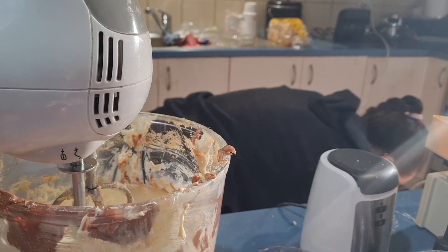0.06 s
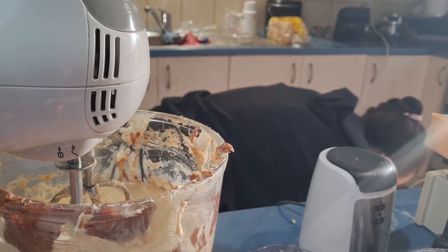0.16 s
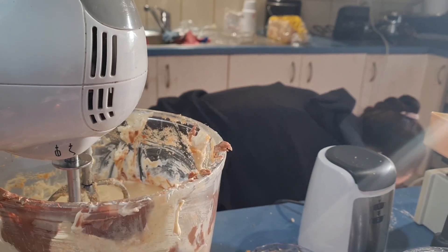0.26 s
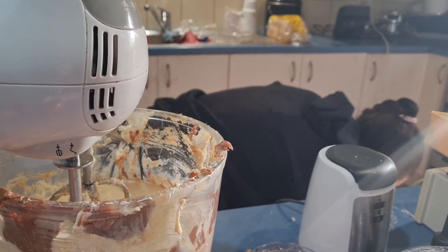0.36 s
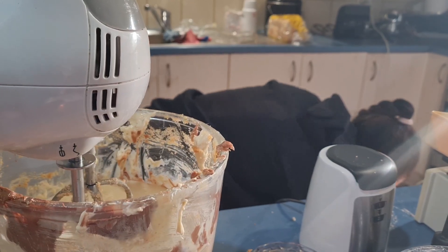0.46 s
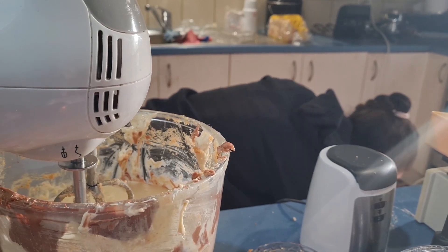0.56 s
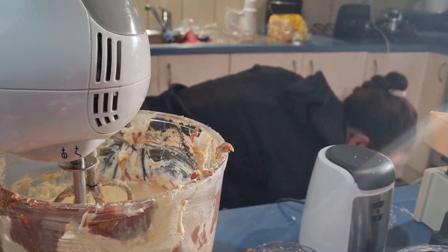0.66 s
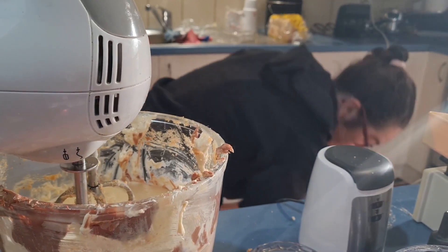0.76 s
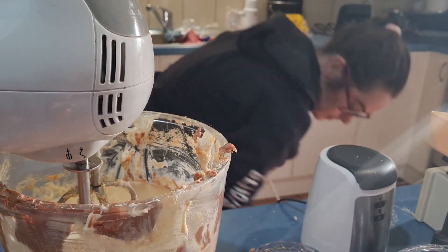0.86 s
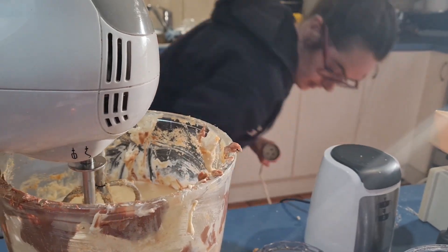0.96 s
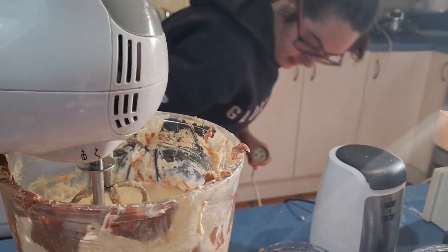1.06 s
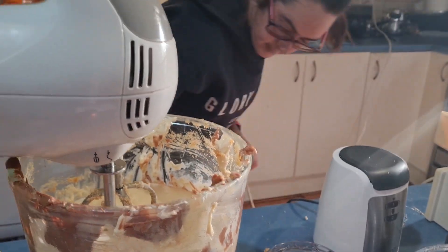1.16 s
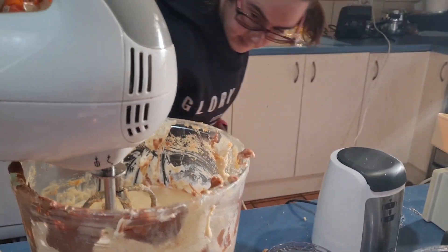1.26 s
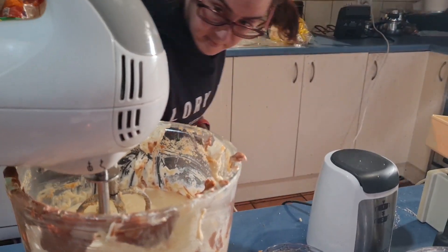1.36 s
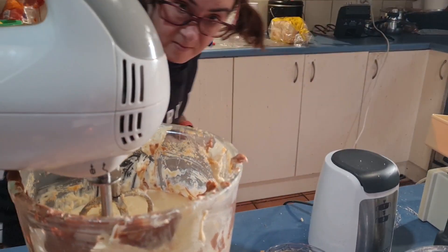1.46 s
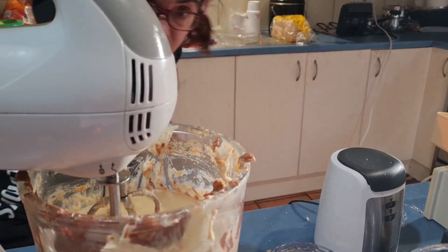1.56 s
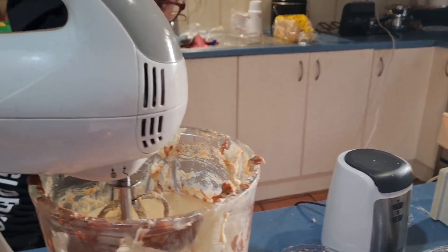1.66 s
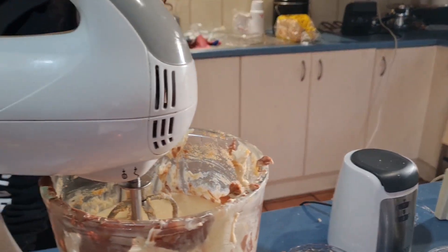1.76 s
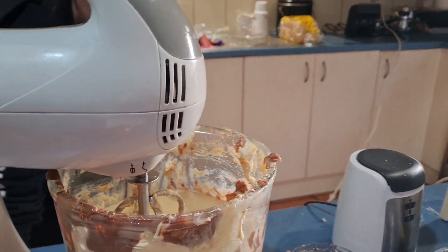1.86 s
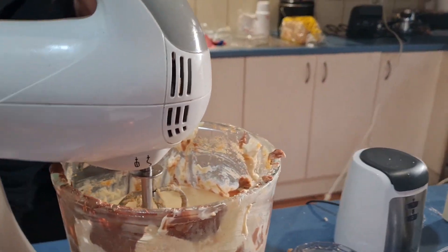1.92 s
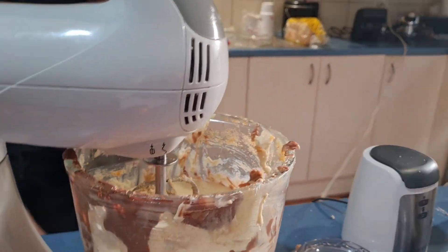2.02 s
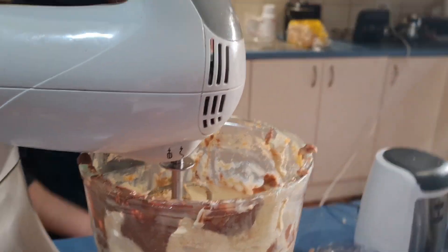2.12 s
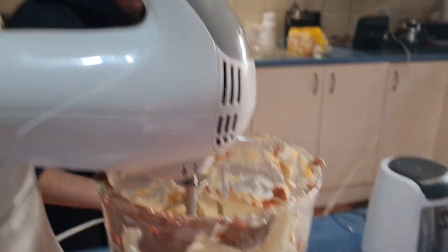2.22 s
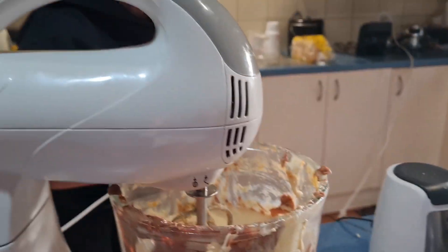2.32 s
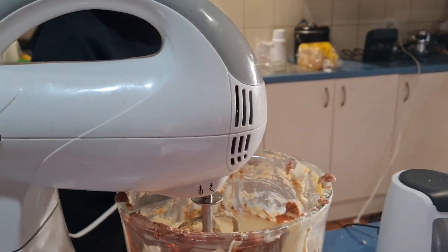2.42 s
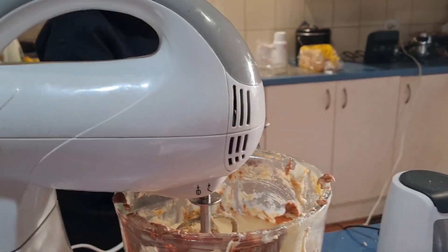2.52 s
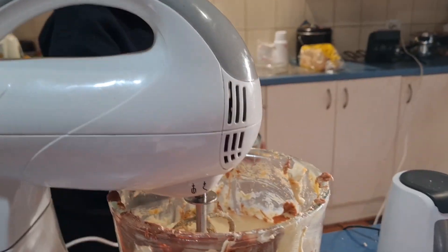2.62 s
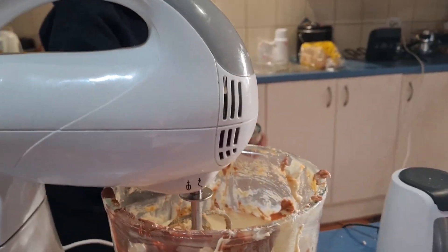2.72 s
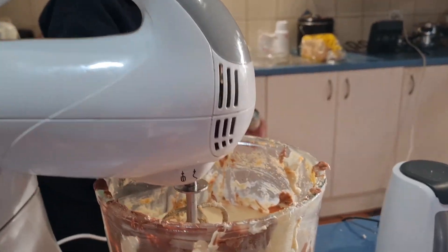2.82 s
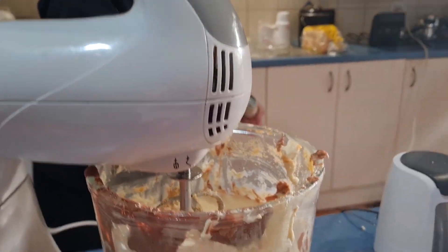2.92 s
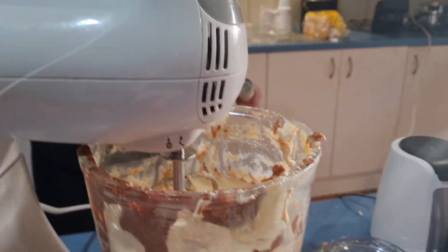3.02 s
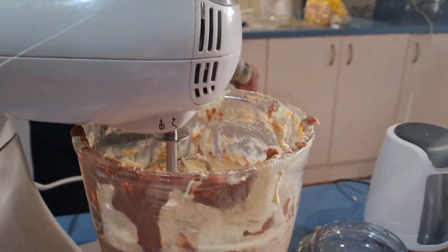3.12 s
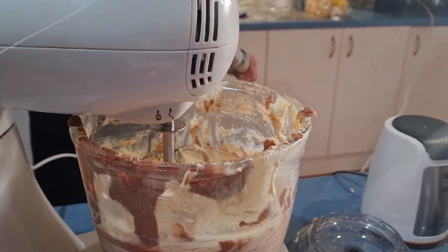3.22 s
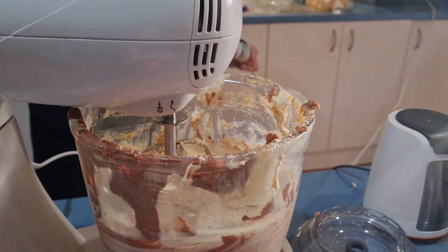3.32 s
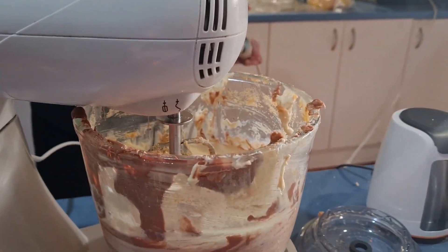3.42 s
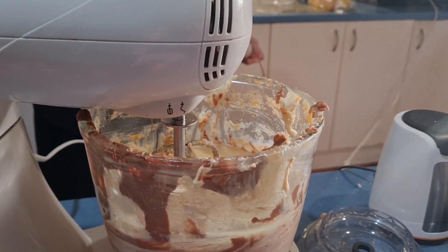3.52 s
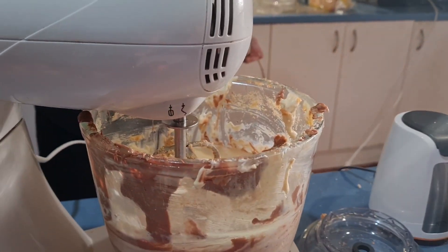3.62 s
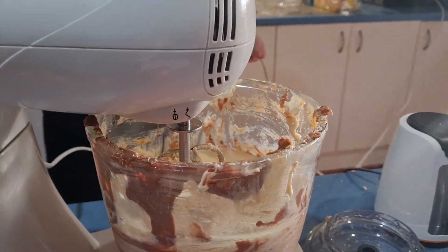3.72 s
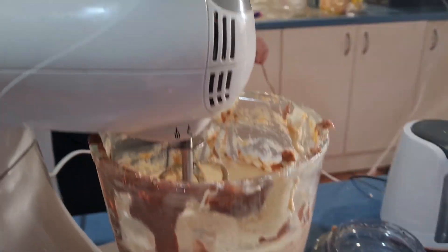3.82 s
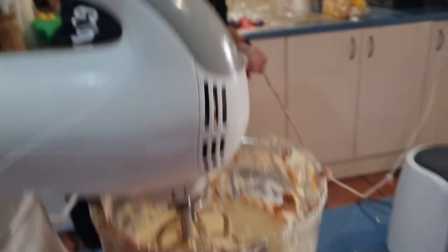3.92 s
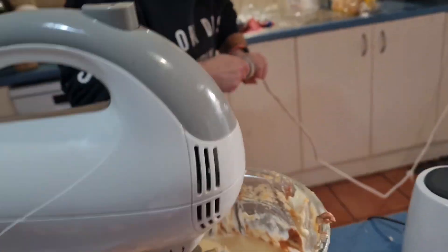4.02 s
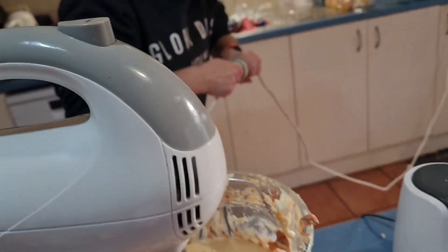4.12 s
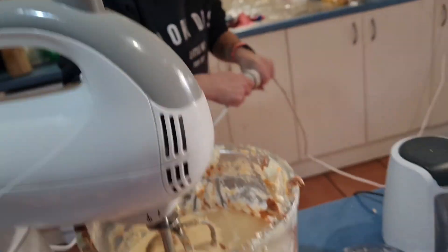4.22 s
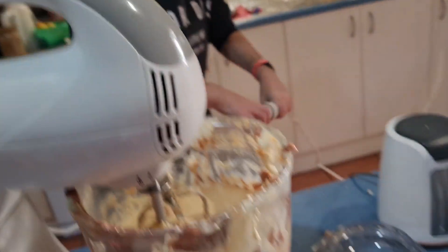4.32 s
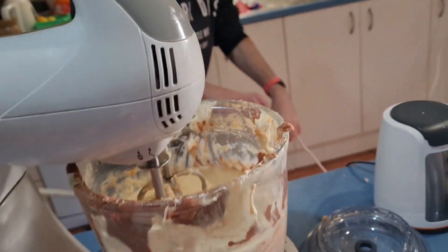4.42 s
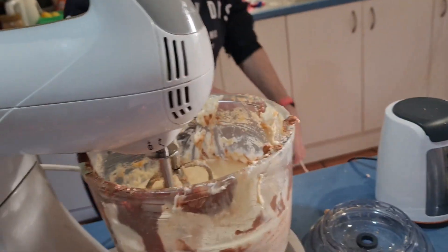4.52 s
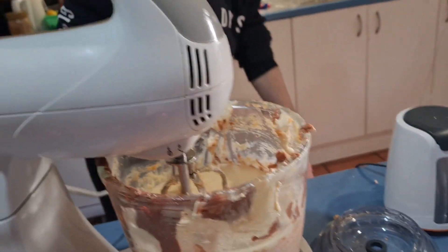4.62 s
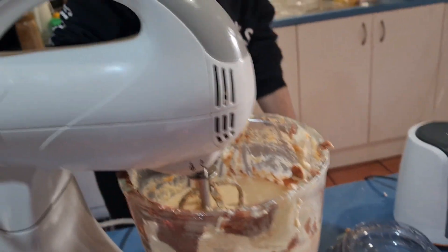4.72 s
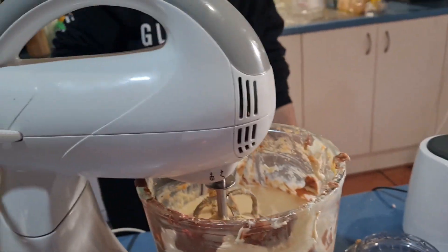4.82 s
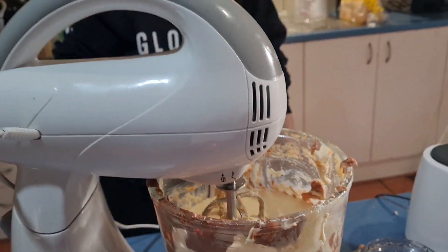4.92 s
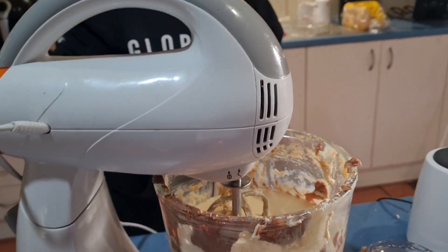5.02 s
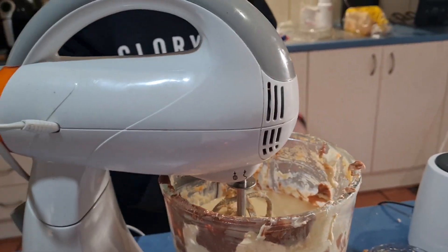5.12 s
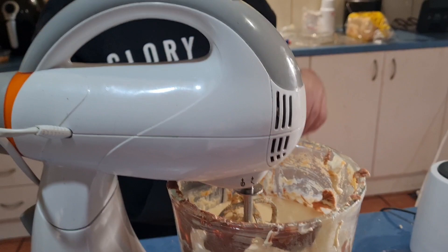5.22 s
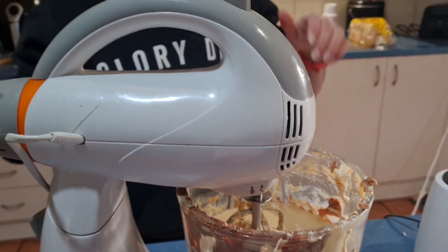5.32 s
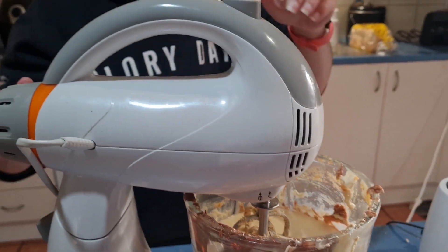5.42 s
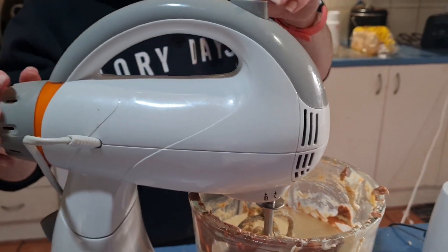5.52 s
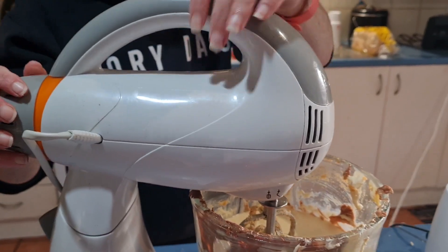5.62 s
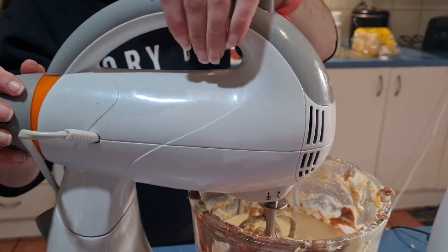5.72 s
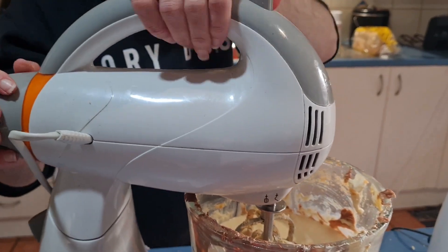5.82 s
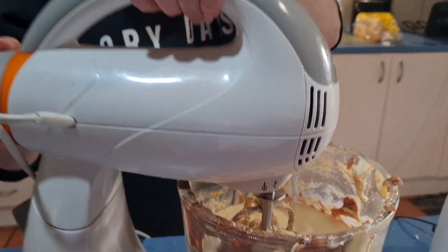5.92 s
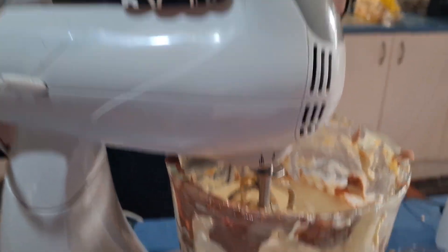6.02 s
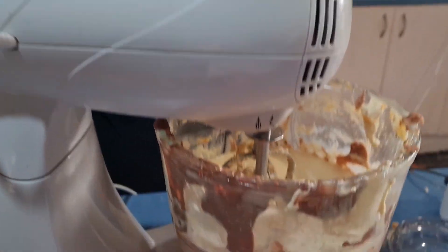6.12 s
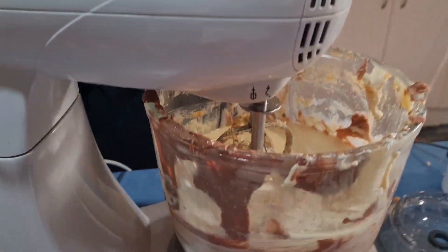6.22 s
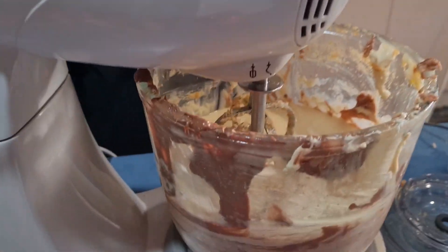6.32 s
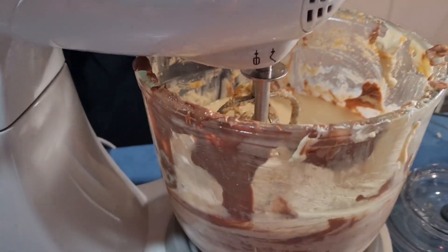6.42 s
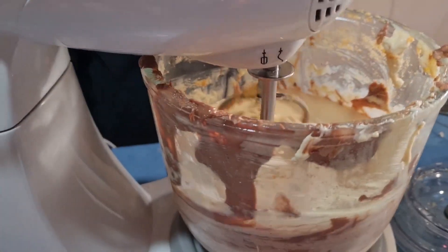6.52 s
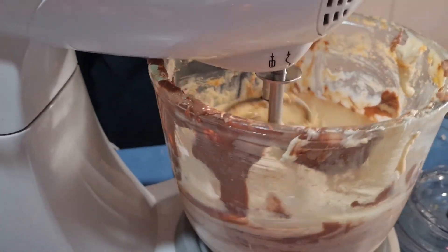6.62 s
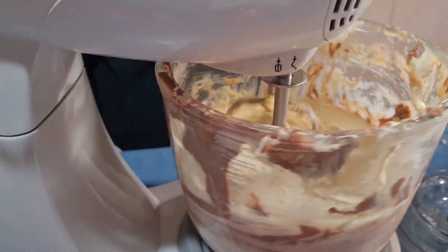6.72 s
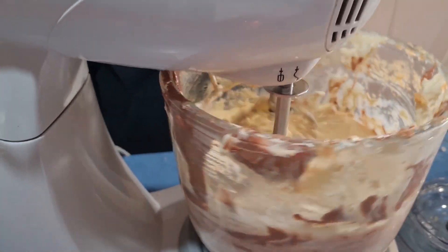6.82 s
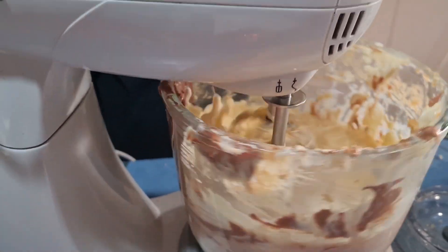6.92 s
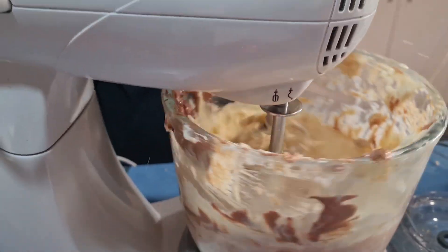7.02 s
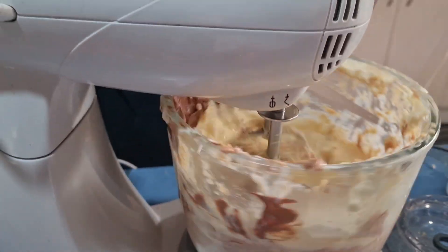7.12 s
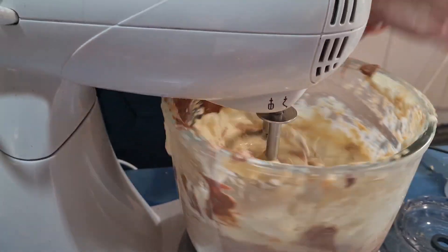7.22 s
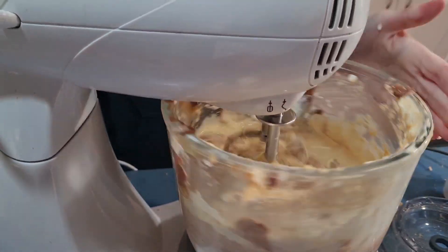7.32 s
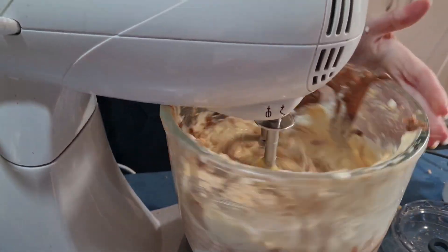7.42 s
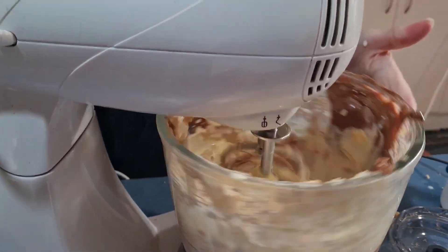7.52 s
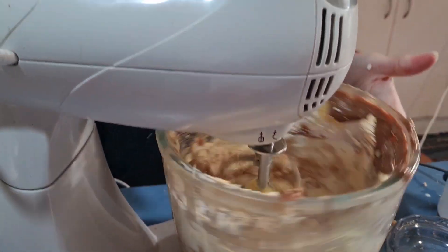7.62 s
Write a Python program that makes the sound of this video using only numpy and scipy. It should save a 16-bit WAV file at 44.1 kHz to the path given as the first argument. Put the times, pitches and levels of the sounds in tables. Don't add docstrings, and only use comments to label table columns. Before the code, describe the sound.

In a quiet tiled kitchen, slipper soles scuff and light taps and plastic plug knocks sound on a worktop, one hard thump early on. A brief scraping rub follows as the plug goes in. Then a switch snaps loudly and a nearby mixer motor spins up to a rough whining roar, beaters ticking and ringing a glass bowl. Close handheld phone, stereo.

```python
import sys
import numpy as np
from scipy import signal
from scipy.fft import rfft, irfft, next_fast_len
from scipy.io import wavfile
from scipy.ndimage import uniform_filter1d

SR = 44100
rng = np.random.default_rng(int(sys.argv[2]) if len(sys.argv) > 2 else 0)


def invert_db(level):
    return 10 ** (np.asarray(level, dtype=float) / 20)


def output_pcm(signal):
    pcm = np.clip(np.atleast_2d(signal).T, -1, 1) * 32767
    wavfile.write(sys.argv[1], SR, np.round(pcm).astype(np.int16))


N = 337792

TAIL_S = np.arange(12000) / SR
FIELD_HZ, BARS = 100, 24
FULL_HZ = 160
ROAR = (-28.5, 7.4)
# (frequency [Hz], width [Hz], level [dB])
WHINE_LEFT = [(2670, 140, -35), (2900, 200, -41), (3190, 280, -33.5), (3480, 160, -45), (3850, 60, -34),
              (3930, 100, -52), (4020, 40, -35)]


def evened(x):
    return x / np.sqrt(np.mean(x ** 2) + 1e-20)


def read(points, hz):
    f, value = np.transpose(points)
    return np.interp(np.log(hz + 1), np.log(f + 1), value)


def add(mix, start_s, sound):
    part = mix[round(start_s * SR):][:len(sound)]
    part += sound[:len(part)]


def band(x, lo_hz, hi_hz):
    return evened(signal.sosfilt(signal.butter(3, [lo_hz, hi_hz], "band", fs=SR, output="sos"), x))


def coloured(size, spectrum):
    gain = invert_db(read(spectrum, np.fft.rfftfreq(size, 1 / SR)))
    return irfft(rfft(rng.standard_normal(size)) * gain, size)


def resonate(x, hz, width_hz):
    turn = np.exp(2j * np.pi * np.cumsum(hz * np.ones(len(x))) / SR)
    r = np.exp(-np.pi * width_hz / SR)
    return 2 * (turn * signal.lfilter([1 - r], [1, -r], x / turn)).real


def waver(size, span_s):
    steps = round(span_s * SR)
    return evened(uniform_filter1d(uniform_filter1d(rng.standard_normal(size), steps), steps))


def burst(shape, lo_hz, hi_hz):
    rms = np.sqrt(np.mean(shape ** 2))
    return band(rng.standard_normal(len(shape)) * shape, lo_hz, hi_hz) * rms


def slide(peak_s, db, rise_s, hold_s, fall_s):
    t = np.arange(max(peak_s - rise_s, 0), peak_s + hold_s + fall_s, 1 / SR)
    away = np.maximum((peak_s - t) / rise_s, (t - peak_s - hold_s) / fall_s)
    return t, db - 30 * np.maximum(away, 0)


def rings(rows, rise_s):
    out = np.zeros(N)
    for s, hz, db, t60_s in rows:
        envelope = invert_db(db - 60 * TAIL_S / t60_s) * np.minimum(TAIL_S / rise_s, 1)
        add(out, s, envelope * np.sin(2 * np.pi * hz * TAIL_S))
    return out


def air():
    # (frequency [Hz], density [dB per Hz])
    air_spectrum = [(12, -26), (20, -16), (86, -11.5), (107, -12), (210, -9.5), (347, -13.5), (434, -10),
                    (485, -10), (574, -12), (759, -9.5), (825, -13.5), (949, -13.5), (3070, -21),
                    (4540, -31.5), (16000, -57.5)]
    # (time [s], half length [s], cloth lift [dB], hum lift [dB])
    swells = [(.05, 0.19, 5.5, 0.5), (1.36, 0.16, 6.5, 3), (1.944, 0.26, -0.5, 2.5), (2.446, 0.18, 7.5, 0),
              (2.93, 0.15, 6, -0.7), (3.91, 0.062, 12.5, 0.5), (4.62, 0.12, 8, -0.6), (4.95, 0.13, 12, 1),
              (5.3, 0.17, 4, 3), (5.913, 1, 2.5, 1.2)]
    t, noise = np.arange(N) / SR, coloured(N, air_spectrum)
    lifts_db = [np.outer(lift_db, np.exp(-((t - s) / half_s) ** 2)) for s, half_s, *lift_db in swells]
    cloth_db, hum_db = sum(lifts_db)
    cloth_db = cloth_db - 76.5 + 7.5 + 1.2 * waver(N, .02)
    hum_db = hum_db - 62 + 1.2 * waver(N, .04)

    low = signal.sosfilt(signal.butter(2, 900, fs=SR, output="sos"), noise)
    hum = evened(low)
    for hz, width_hz, db in [(587.5, 27, -9.5), (219.0, 25, -17.5), (73.0, 11, -17)]:
        hum += invert_db(db) * evened(resonate(noise, hz, width_hz))
    cloth = evened(noise - low)
    hiss = invert_db(-94) * band(rng.standard_normal(N), 9000, 17000)
    return hum * invert_db(hum_db) + cloth * invert_db(cloth_db) + hiss


def scuffs():
    # (peak time [s], hiss level [dB], rise [s], fall [s], body level [dB rel hiss])
    strokes = [(0.012, -62, 0.096, 0.045, -5.5), (0.092, -65, .015, 0.074, 12.5),
               (0.64, -55, 0.017, 0.14, 1.5), (0.747, -73, .04, 0.08, -3), (.992, -66.5, 0.045, .08, 0.5),
               (1.309, -63, .015, 0.06, 3), (1.335, -67, .04, 0.12, 10), (1.52, -64, 0.05, 0.055, 4),
               (1.845, -73.5, 0.018, 0.091, 8), (2.441, -84, .35, 0.29, 14),
               (3.168, -82.5, 0.034, 0.22, 11), (4.397, -84, 0.06, 0.076, 9), (4.91, -80, .08, .06, -3),
               (4.985, -79, .04, .07, -3), (5.868, -80, 0.028, .04, 4), (5.918, -79, .03, .06, 6)]
    # (frequency [Hz], density [dB per Hz])
    sliding_hiss = [(2060, -39.5), (3500, -21), (4970, -15), (6010, 7.5), (7300, 2), (8470, 7), (10700, -2),
                    (16000, -5)]
    out = np.zeros(N)
    for s, db, rise_s, fall_s, body_db in strokes:
        t, hiss_db = slide(s, db, rise_s, 0.017, fall_s)
        body = invert_db(body_db) * band(rng.standard_normal(len(t)), 1000, 5500)
        grain = invert_db(hiss_db + 3.8 * waver(len(t), 0.0023))
        friction = evened(coloured(len(t), sliding_hiss)) + body
        add(out, t[0], grain * friction * signal.windows.tukey(len(t), .15))
    return out


def thumps():
    # (time [s], peak level [dB], frequency [Hz], t60 [s])
    worktop = [(0.096, -37.5, 171, 0.13), (0.631, -49, 138, 0.12), (2.055, -20, 82, 0.058),
               (2.118, -62, 69, 0.098), (4.723, -45.5, 186, 0.13), (5.726, -41.5, 220, 0.11),
               (5.849, -45, 217, 0.13), (6.446, -25, 142, 0.31)]
    out, t = np.zeros(N), TAIL_S
    for s, db, hz, t60_s in worktop:
        sag = np.sin(2 * np.pi * hz * t * (1 - 2.1 * t))
        add(out, s, invert_db(db - 60 * t / t60_s) * sag * np.minimum(t / 0.013, 1))
    return out


def knocks():
    # (time [s], body peak [dB], edge level [dB rel body], t60 [s])
    light_taps = [(0.0979, -46, 6.5, 0.23), (0.6296, -39, -4.5, 0.24), (1.3051, -58, -1, 0.31),
                  (1.8442, -53, -8, 0.12), (1.9062, -29, -29, 0.055), (2.3284, -53, -10, 0.093),
                  (2.389, -61, -5, 0.079), (2.5524, -37, -26, 0.096), (2.7753, -56.5, -11, 0.12),
                  (3.1426, -64, -5, 0.074), (3.1702, -57.5, 2, 0.099), (3.4214, -56, -12, 0.076),
                  (3.497, -44.5, -3, 0.089), (4.725, -29, -1, 0.06), (5.7259, -50, -34, 0.066),
                  (5.8403, -49.5, -9, 0.2), (5.868, -52.5, 11.5, 0.052), (5.918, -62, 9, 0.065)]
    clicks = [
        (0.635, -41, -2.5, 0.25),
        (1.88, -46.5, -0.5, 0.099),
        (3.7918, -61, -0.5, 0.081),
        (4.3852, -58, -16, 0.41),
    ]
    plug_knocks = [(2.0549, -27.5, -16, 0.069), (2.456, -33.5, -5, 0.1), (3.2711, -32, 4.5, 0.12),
                   (3.8663, -30.5, -0.5, 0.09), (5.5105, -43.5, -6, 0.046), (5.7848, -59, -19, 0.12),
                   (6.28, -58, -5, 0.13)]
    switch = [
        (6.436, -40, -2, .1),
        (6.4428, -17, -1, .035),
        (6.446, -25, -9, .18),
        (6.9609, -19, -9, .04),
    ]
    kinds = [(light_taps, (-0.56, -0.46, -15)), (plug_knocks, (-3, -0.64, -22)),
             (clicks, (-4, -0.91, 1.1)), (switch, (2, .01, -1))]
    out, t = np.zeros(N), TAIL_S
    blow = (1 + 1.34 * np.exp(-t / 0.0021)) * np.minimum(t / 0.0012, 1)
    for rows, (thud_0_db, slope, tick_0_db) in kinds:
        for s, db, edge_db, t60_s in rows:
            fall_db = -60 * t / np.clip(t60_s, .02, .6)
            thud_db = thud_0_db + slope * (db + 42.5)
            tick_db = tick_0_db + edge_db
            thud = burst(blow * invert_db(thud_db + 0.59 * fall_db), 206, 840)
            body = burst(blow * invert_db(fall_db), 970, 2020)
            edge = burst(blow * invert_db(edge_db + 0.99 * fall_db), 1640, 4110)
            tick = burst(blow * invert_db(tick_db + 2.5 * fall_db), 3200, 11100)
            add(out, s, invert_db(db - 8.5) * (thud + body + edge + tick))
    return out


def pings():
    # (time [s], frequency [Hz], level [dB], t60 [s])
    knock_modes = [(.098, 1970, -45.5, 0.081), (.636, 1990, -38, 0.11), (.632, 2570, -39.5, 0.27),
                   (1.842, 572, -37.5, 0.11), (1.88, 3000, -50.5, 0.11), (1.908, 488, -37.5, 0.054),
                   (1.908, 1175, -39.5, 0.11), (2.057, 667, -31, 0.059), (2.057, 1115, -31, 0.081),
                   (2.057, 1370, -34.5, 0.12), (2.389, 3180, -48, 0.033), (2.458, 660, -41, 0.087),
                   (2.555, 1500, -49, 0.056), (2.593, 3070, -47.5, 0.024), (2.055, 2740, -43.5, 0.062),
                   (3.273, 670, -40, 0.19), (3.869, 682, -34, 0.052), (5.512, 2230, -46.5, 0.025),
                   (5.725, 1290, -43, 0.034), (5.84, 1140, -39.5, 0.044), (5.917, 6300, -58, 0.04)]
    mixer_body = [
        (6.445, 246, -24.5, 0.41),
        (6.445, 970, -25.5, 0.47),
        (6.962, 680, -26, .15),
    ]
    out = np.zeros(N)
    for s, hz, db, t60_s in knock_modes + mixer_body:
        envelope = invert_db(db - 2.5 - 60 * TAIL_S / t60_s) * np.minimum(TAIL_S / 0.00073, 1)
        add(out, s, burst(envelope, 0.878 * hz, 1.123 * hz))
    return out


def cracks():
    # (time [s], peak level [dB], frequency [Hz])
    contacts = [(.6302, -33, 1900), (.636, -29, 1900), (.6378, -29, 2100), (2.4578, -34, 2900),
                (2.4602, -33, 2400), (2.4652, -34, 2000), (3.2735, -29, 3300), (3.2752, -28, 2900),
                (3.28, -31, 2200), (4.7253, -23, 2500), (4.727, -26, 1700), (5.8695, -38, 3100),
                (5.873, -39, 3700), (6.4428, -17, 1100), (6.4442, -18, 2100), (6.9622, -16, 800)]
    # (time [s], frequency [Hz], level [dB], t60 [s])
    plates = [(2.458, 1150, -42, .05), (2.458, 2850, -42, .05), (2.463, 2000, -40, .05),
              (2.458, 4300, -50, .03), (3.273, 2050, -36, .06), (3.273, 1150, -40, .05),
              (3.273, 3390, -37, .05), (3.285, 2920, -43, .12), (3.273, 4900, -46, .04),
              (3.869, 1868, -40, .07), (3.869, 2256, -40, .045), (3.869, 3305, -41, .042),
              (4.727, 635, -37, .12), (4.726, 1281, -36, .06), (4.726, 2557, -42, .07),
              (4.726, 2837, -40, .04), (5.87, 3112, -47, .046), (5.87, 3768, -48, .037),
              (5.87, 4420, -53, .05), (5.87, 6304, -56, .1), (5.839, 1170, -46, .08),
              (5.917, 3050, -47, .04), (2.389, 3200, -51, .04), (3.5, 5900, -64, .06),
              (3.795, 2780, -58, .08), (2.056, 1250, -33, .04), (6.443, 980, -22, .05)]
    cycles = 4.5
    contact = -invert_db(6.5) * rings([(s, hz, db, cycles / hz) for s, db, hz in contacts], .0001)
    both = signal.butter(2, 400, "high", fs=SR, output="sos")
    return signal.sosfilt(both, contact) + invert_db(1.5) * rings(plates, .0008)


def phone_jolts():
    # (time [s], frequency [Hz], level [dB], t60 [s])
    jolts = [
        (2.056, 36, -26.5, 0.18),
        (2.112, 34, -44, 0.11),
    ]
    return np.outer([1, -.3], rings(jolts, .008))


def pin_rings():
    # (time [s], frequency [Hz], level [dB], t60 [s])
    pins = [(3.17, 1310, -63, .35), (3.17, 2650, -68, .2), (3.175, 5450, -73, .25), (3.505, 5960, -73, .2),
            (3.8, 2780, -64, .18), (4.395, 9200, -79, .25), (2.389, 3200, -52, .05)]
    return rings(pins, .003) * (.6 + waver(N, .0015))


def rubs():
    # (full level from [s], level [dB], rise [s], hold [s], fall [s])
    rub_strokes = [
        (4.9, -47.5, 0.075, 0.033, 0.02),
        (4.98, -45.5, 0.012, 0.016, 0.02),
        (5.008, -41.5, .03, .008, .04),
        (5.188, -59, 0.12, .005, 0.037),
    ]
    # (frequency [Hz], width [Hz], level [dB])
    plug = [(1230, 33, 22.5), (1560, 33, 13), (1590, 190, 11), (2130, 68, 1), (2700, 23, 8.5),
            (3080, 30, 1), (3660, 57, -35)]
    out = np.zeros(N)
    for row in rub_strokes:
        t, db = slide(*row)
        jerks = rng.random(len(t)) < 900 / SR
        slips = rng.standard_normal(len(t)) * (0.33 + 3.7 * jerks)
        body = sum(invert_db(mode_db) * evened(resonate(resonate(slips, hz, 2.0 * width_hz + 60), hz, 500))
                   for hz, width_hz, mode_db in plug)
        rub = evened(body) + 0.42 * band(slips, 1400, 3000)
        add(out, t[0], invert_db(db + 4.0) * rub * signal.windows.tukey(len(t), .15))
    return out


def spin():
    # (time [s], shaft speed [Hz])
    speed = [(6.44, 55.7), (6.544, 84.5), (6.65, 110.6), (6.74, 129.5), (6.81, 139.6), (6.9, 149),
             (7.03, 157.5), (7.25, 161.4), (7.66, 167.4)]
    s, hz = np.transpose(speed)
    t = np.arange(s[0], s[-1], 1 / SR)
    hz = np.interp(t, s, hz)

    def level_at(db, per_octave_db):
        return db + per_octave_db * np.log2(hz / FULL_HZ)
    return t, hz, level_at


def whine(hz, housing):
    return np.sqrt(sum(invert_db(2 * db) / (1 + (2 * (hz - f) / width_hz) ** 4) for f, width_hz, db in housing))


def bar_whine():
    # (frequency [Hz], width [Hz], level [dB])
    whine_right = [(2670, 140, -35), (2900, 200, -41), (3190, 280, -33.5), (3480, 160, -44),
                   (3825, 85, -35), (3915, 60, -46), (4015, 50, -35)]
    # (shaft order [-], level at full speed [dB])
    side_orders = [(12, -50), (21, -45), (22, -48), (23, -48), (25, -45), (27.5, -51), (48, -57)]
    t, hz, level_at = spin()
    shaft = 2 * np.pi * np.cumsum(hz * (1 + .0008 * waver(len(t), .0084))) / SR
    out = np.zeros((2, N))
    for port, housing in enumerate([WHINE_LEFT, whine_right]):
        gain = whine(BARS * hz, housing) * invert_db(1.0 + 1.5 * waver(len(t), .02))
        main = gain * np.sin(BARS * shaft + .4 * np.sin(2 * np.pi * FIELD_HZ * t) + port)
        side = sum(invert_db(level_at(db, 14) + 4 * waver(len(t), .06)) * np.sin(k * shaft + 2 * port)
                   for k, db in side_orders)
        add(out[port], t[0], np.sqrt(2) * (main + side))
    return out


def motor_roar():
    # (frequency [Hz], density [dB per Hz])
    housing = [(15, -89), (25, -27), (127, 11), (157, -23), (229, -0.5), (263, 11), (301, 5), (439, -28),
               (607, -9), (1560, -21.5), (1890, -18.5), (2410, -23.5), (3920, -20.5), (5000, -15.5),
               (16000, -24)]
    # (frequency [Hz], width [Hz], level [dB rel roar])
    shell_modes = [(640, 34, -9), (950, 50, -7), (1930, 90, -10), (3120, 80, -13), (8970, 200, -24),
                   (7780, 150, -30), (2800, 60, -14), (810, 40, -8), (4490, 85, -25), (5300, 70, -29),
                   (5840, 120, -31), (360, 30, -10)]
    t, hz, level_at = spin()
    size = len(t)
    roar_db, rush_db = level_at(*ROAR), level_at(-28.5, 4.1)
    fan_db, hiss_db = level_at(-45.5, 12), level_at(-44, 16)
    throb = 1 + 0.2 * np.cos(2 * np.pi * np.cumsum(hz) / SR) + 0.25 * np.cos(2 * np.pi * FIELD_HZ * t)
    throb *= invert_db(0.68 * waver(size, 0.0021))

    def layer(db, lo_hz, hi_hz):
        return invert_db(db) * band(coloured(size, housing) * throb, lo_hz, hi_hz)

    white = rng.standard_normal(size) * throb
    shell = np.zeros(size)
    for f, width_hz, db in shell_modes:
        mode = evened(resonate(white, f * (1 + .012 * waver(size, .08)), width_hz))
        shell += invert_db(level_at(db, 0.00086 * f) + 3.0 * waver(size, 0.04)) * mode
    brushes = evened(resonate(resonate(white, 0.92 * BARS * hz, 1100), 1.02 * BARS * hz, 1900))
    fuzz = evened(resonate(rng.standard_normal(size), BARS * hz, 130))
    fuzz *= whine(BARS * hz, WHINE_LEFT) * invert_db(-12)

    low = layer(roar_db - 10.5, 49, 420) + layer(roar_db, 453, 1500) + layer(rush_db - 2.5, 1270, 3500)
    high = invert_db(rush_db - 14.5) * brushes + fuzz
    high += layer(fan_db, 3000, 12700) + layer(hiss_db, 11600, 21500)
    current = np.clip((t - 6.442) / .01, 0, 1)
    out = np.zeros(N)
    add(out, t[0], (low + high + invert_db(roar_db) * shell) * current)
    return out


def motor_lines():
    # (frequency [Hz], level [dB])
    mount = [(56, -58), (107, -58), (125, -37.5), (165, -30), (200, -45), (236, -40), (261, -27.5),
             (268, -31)]
    mixes = [(1, 2), (1, -1), (2, 0)]
    mixes_db = [-13, -35, -27]
    harmonics_db = [-21.5, -5.5, -46, -17, -19, -7.5, -13, -30, -19]
    t, hz, level_at = spin()
    spin_db, beat_db, roar_db = read(mount, hz), read(mount, hz + FIELD_HZ), level_at(*ROAR)
    shaft = 2 * np.pi * np.cumsum(hz * (1 + 0.0015 * waver(len(t), 0.0084))) / SR
    field = 2 * np.pi * FIELD_HZ * t

    def tone(turn, db, loose_db):
        gain = np.sqrt(2) * invert_db(db + loose_db * waver(len(t), 0.012))
        return gain * np.sin(turn + 2 * np.pi * rng.random())

    lines = tone(shaft, spin_db + .5, 2.0) + tone(shaft + field, beat_db - .5, 2.0)
    for (a, b), db in zip(mixes, mixes_db):
        lines += tone(a * shaft + b * field, beat_db + db, 1.4)
    for k, db in enumerate(harmonics_db, 1):
        lines += tone(k * field, roar_db + db, 2.6)
    out = np.zeros(N)
    add(out, t[0], lines * np.clip((t - 6.444) / .006, 0, 1))
    return out


def beater_ticks():
    # (time [s], peak level [dB], frequency [Hz])
    beats = [(6.4637, -27, 8020), (6.478, -33, 8000), (6.729, -20, 12500), (6.7407, -21.5, 7900),
             (6.9618, -15, 13100), (6.986, -18, 8100), (7.1322, -19.5, 9100), (7.1833, -19.5, 10000),
             (7.284, -21, 7300), (7.425, -28, 12400), (7.4475, -26, 7800), (6.5048, -32, 5600),
             (6.5477, -28, 5400), (6.7942, -25, 5800), (6.9428, -24, 4900), (7.0211, -21, 5500),
             (7.06, -25, 6000)]
    out = np.zeros(N)
    for s, db, hz in beats:
        ping = burst(invert_db(db - 10.5 - 60 * TAIL_S / 0.0083), 0.94 * hz, 1.07 * hz)
        splash = burst(invert_db(db - 9 - 60 * TAIL_S / 0.017), 2800, 18000)
        add(out, s, ping + splash)
    return out


def glass_rings():
    # (time [s], frequency [Hz], level [dB], t60 [s])
    glass = [
        (6.955, 608, -21.5, .3),
        (7.02, 602, -22.5, .3),
        (7.425, 602, -22, .3),
        (7.53, 601, -27, .35),
        (7.61, 362, -22, .3),
    ]
    return rings(glass, 0.0013)


def room(x, room_db):
    # (frequency [Hz], t60 [s])
    kitchen = [(250, 0.42), (660, 0.27), (1740, 0.23), (4590, 0.13)]
    taps = np.zeros((2, SR // 2))
    at = np.arange(150, SR // 2 - 20, 20) + rng.integers(0, 20, (2, (SR // 2 - 151) // 20))
    np.put_along_axis(taps, at, rng.choice([-1., 1.], at.shape), 1)
    hz, t, z = signal.stft(taps, SR, nperseg=256)
    t60_s = np.clip(read(kitchen, hz), .08, .8)[:, None]
    tail = signal.istft(z * invert_db(-60 * t / t60_s), SR, nperseg=256)[1]
    wet = signal.fftconvolve(x[None], tail / np.linalg.norm(tail[0]), axes=1)[:, :N]
    return (x + invert_db(room_db) * wet) / np.sqrt(1 + invert_db(2 * room_db))


def ports(shared, apart):
    # (frequency [Hz], likeness [-])
    likeness = [(60, 0.64), (120, 1), (240, 0.81), (480, 0.17), (950, -1.1), (1890, -0.34), (3770, -0.81),
                (7520, -1), (15000, -0.87)]
    # (frequency [Hz], left minus right [dB])
    tilt = [(60, -0.64), (180, -1.8), (550, 0.61), (1650, 1.2), (4970, -0.63), (15000, 2)]
    lag_s = 0.00028
    size = next_fast_len(N + 4096)
    f = np.fft.rfftfreq(size, 1 / SR)
    turn = np.arccos(np.clip(read(likeness, f), 0, 1)) / 2
    a, b = rfft(apart, size)
    common, differing = np.cos(turn) * a, np.sin(turn) * b
    pair = np.array([common + differing, common - differing]) + rfft(shared, size)
    lag = np.exp(-1j * np.pi * f * lag_s / (1 + (f / 1100) ** 2))
    half = invert_db(read(tilt, f) / 2) * lag
    return irfft(pair * [half, 1 / half], size)[:, :N]


def scene():
    struck = thumps() + knocks() + pings() + cracks() + pin_rings() + beater_ticks()
    handling = room(struck, -8) + room(rubs(), -9) + room(scuffs(), 2.5)
    direct = handling.mean(0)
    near_echo = .5 * np.roll(direct, 40)
    steady = np.array([air() + motor_roar(), air() + motor_roar()])
    paths = steady + np.array([direct, handling[0] - direct + near_echo])
    return ports(motor_lines() + glass_rings(), paths) + bar_whine() + phone_jolts()


def roll_off(x):
    return signal.sosfilt(signal.butter(12, 16970, fs=SR, output="sos"), x)


def record(dry):
    low_pass = signal.firwin(401, 15950, window=("kaiser", 9), fs=SR)
    limited = signal.oaconvolve(dry, low_pass[None], "same", axes=1)
    return roll_off(limited)


dry = scene()
out = record(dry)
output_pcm(out)
```